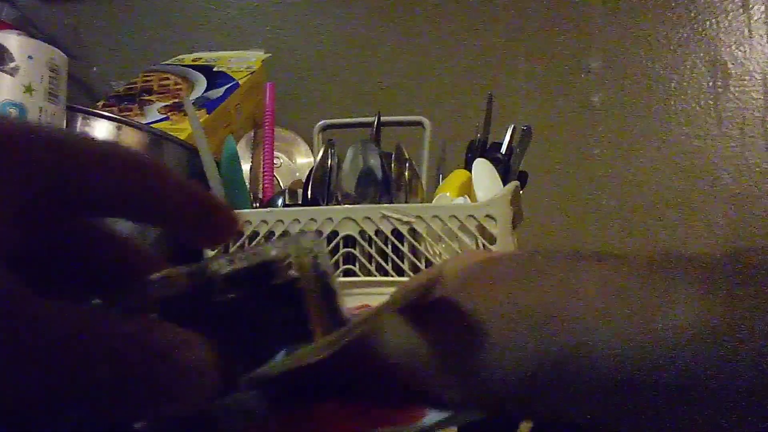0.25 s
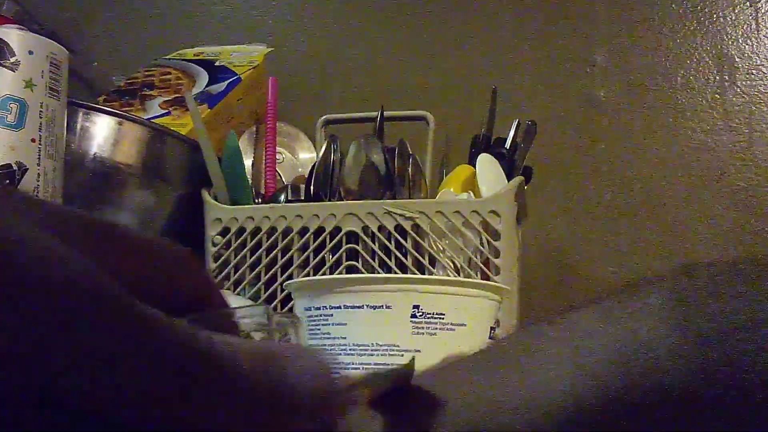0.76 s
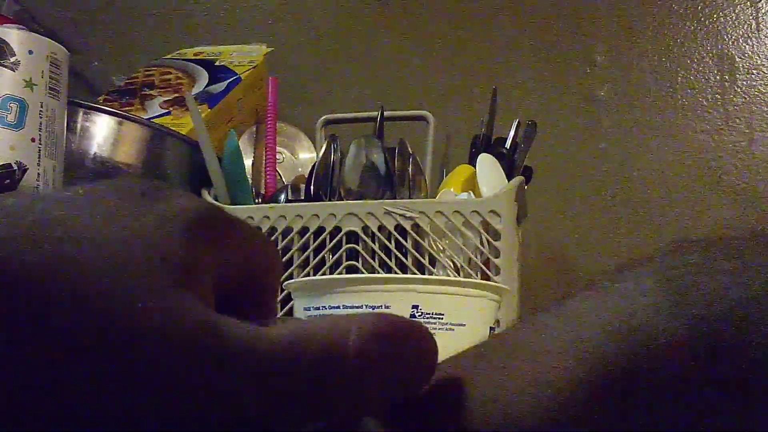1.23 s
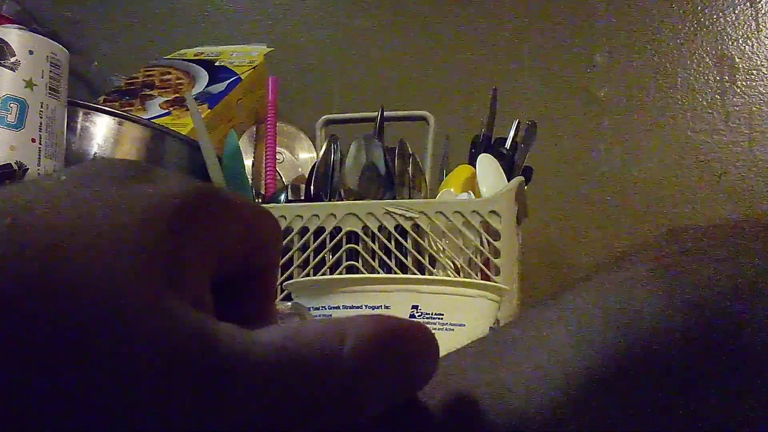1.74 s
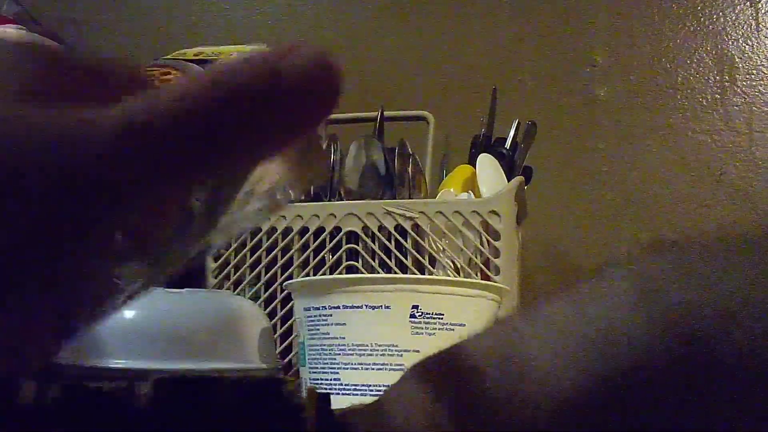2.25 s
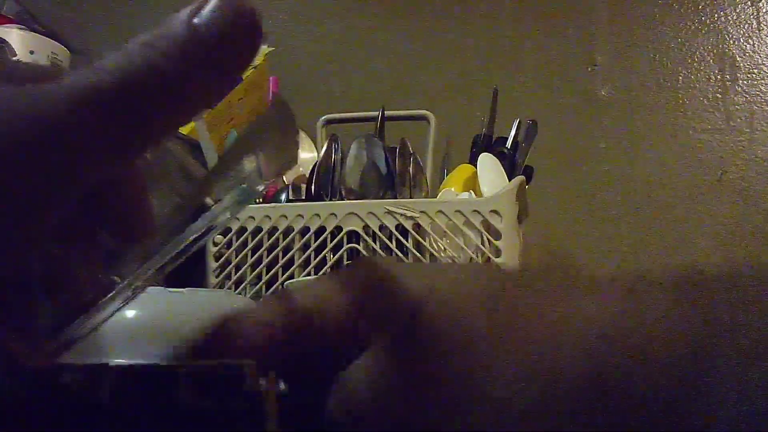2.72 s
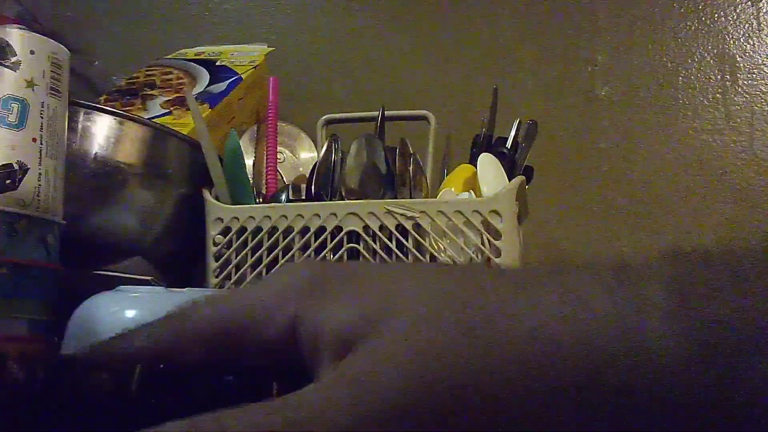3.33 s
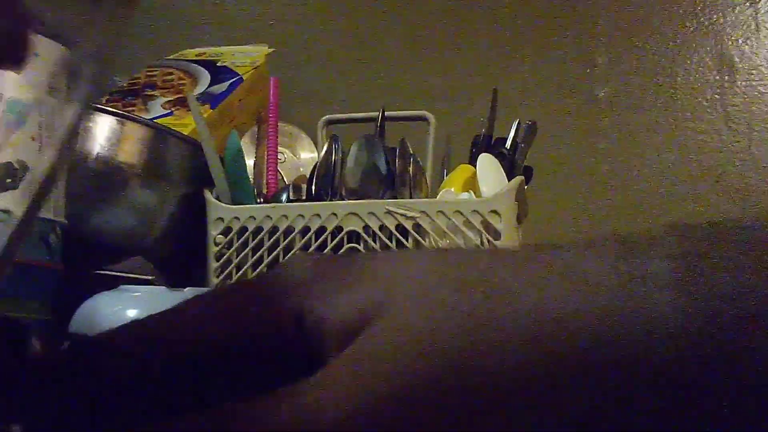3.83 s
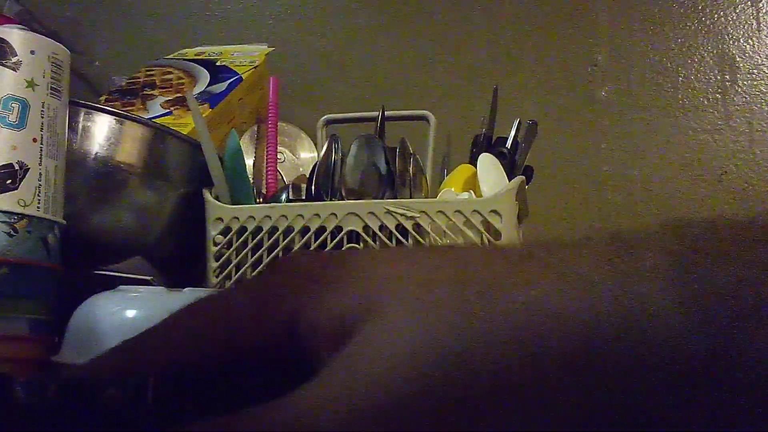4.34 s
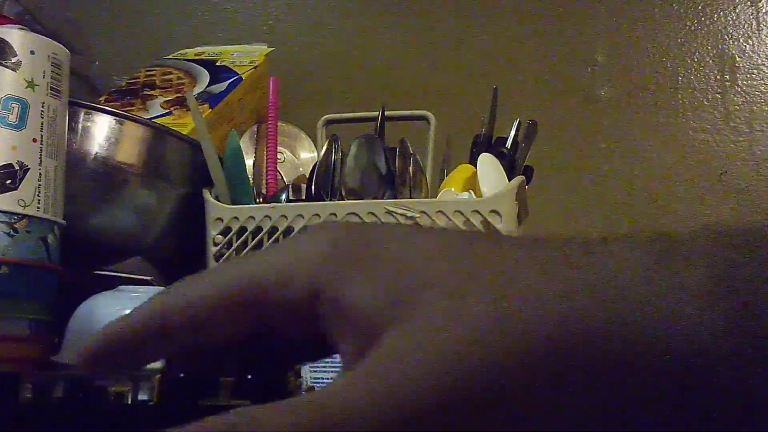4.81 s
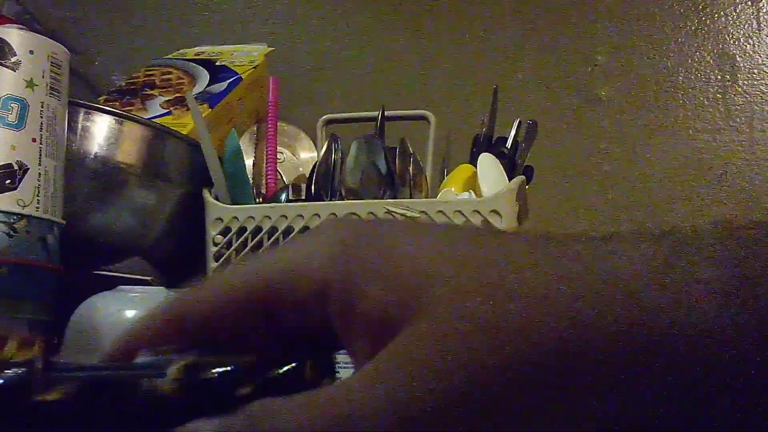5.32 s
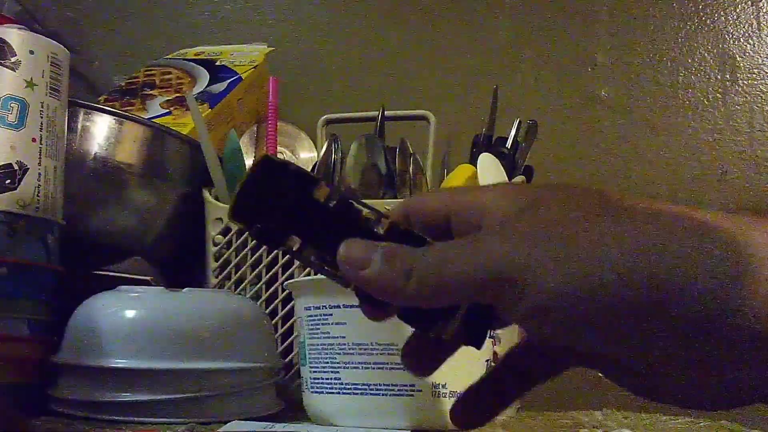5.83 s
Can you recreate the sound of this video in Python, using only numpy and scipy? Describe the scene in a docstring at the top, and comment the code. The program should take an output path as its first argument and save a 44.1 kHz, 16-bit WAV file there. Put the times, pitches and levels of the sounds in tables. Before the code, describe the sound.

Close to the microphone in a small kitchen, hands rub a card-backed plastic pack with soft scuffs and brief stuttering squeaks. A few dull pops lead to a dense burst of snaps, tearing and crackles with counter thumps. Sparser tears and flexes follow, then two hard snaps with short room tails, and finally faint ticks and a light knock.

```python
"""A plastic blister is pulled off its card by hand over a kitchen counter, close to the microphone.
The thin shell snaps and flexes in short noise jolts with ringing modes; the glued card tears in tiny clicks.
Skin rubs in grains and judders in trains of slips; pack and contents knock, hands bump the counter.
Decaying noise bands make the kitchen around it, a smooth background hiss fades in and out, and a limiter
ducks the hardest snaps, so the room swells up behind them; dense noise tails fill it out after two."""
import sys
import numpy as np
from scipy import signal
from scipy.fft import rfft, irfft, next_fast_len
from scipy.io import wavfile
from scipy.ndimage import uniform_filter1d, minimum_filter1d

SR = 44100
rng = np.random.default_rng(int(sys.argv[2]) if len(sys.argv) > 2 else 0)


def waveform_to_disk(signal):
    """Save audio, clipped to [-1, 1], as 16-bit WAV at the path in sys.argv[1]."""
    frames = np.transpose(np.atleast_2d(signal))
    scaled = np.clip(frames, -1, 1) * 32767
    samples = np.round(scaled).astype(np.int16)
    wavfile.write(sys.argv[1], SR, samples)


N = 267687
TIME = np.arange(N) / SR

# steady background of the place, its spectrum: freq_hz [Hz], level_db [dB]
FLOOR_SPECTRUM = [(30, -15), (130, 0.5), (300, -16), (7000, -32)]
FLOOR_DB = -71
# a smooth background hiss fades in and out: start_s [s], length_s [s], level_db halfway [dB]
HISS_SWELLS = [(.1, 0.34, -56.5), (.5, 0.41, -53), (.97, 0.13, -60.5), (1.76, 0.21, -58.5),
               (5.7, 0.49, -57)]
# kitchen decay: freq_hz [Hz], t60_s [s]
ROOM_T60 = [(600, 0.25), (2500, 0.29)]
# a dense, even noise tail of the room swells up behind two hard snaps:
# start_s [s], length_s [s], level_db [dB]
ROOM_TAILS = [(4.125, 0.13, -43), (4.574, 0.039, -34.5)]
# hands bump the counter: start_s [s], level_db of the boom [dB], pitch_hz [Hz], t60_s [s]
BUMPS = [(1.595, -17, 175, 0.045), (2.024, -25.5, 102, 0.06), (2.249, -35.5, 115, 0.22),
         (2.76, -33, 109.6, 0.09), (3.445, -34.5, 131.2, 0.15), (4.265, -27, 128.5, 0.19)]
# skin sticks and slips on the pack: start_s [s], end_s [s], slip_rate [slips per s], level_db [dB]
JUDDERS = [(0.374, 0.522, 91.4, -41.5), (0.655, 0.69, 84, -40), (0.809, 0.847, 76, -46),
           (4.511, 4.545, 136, -27)]
# fingertips scuff the card: start_s [s], length_s [s], level_db halfway [dB]
SCUFFS = [(.02, 0.092, -58.5), (.17, 0.64, -49.5), (.245, 0.019, -46), (.465, 0.019, -37.5),
          (.55, 0.19, -51.5), (.643, 0.0063, -37), (1.055, 0.027, -42), (1.185, 0.27, -53),
          (2.003, 0.022, -29), (5.075, 0.05, -53.5)]
# each pull tears a stretch of card and crinkles the shell: start_s [s], length_s [s], level_db halfway [dB]
PULLS = [(1.965, 0.072, -42.5), (2.015, 0.046, -30.5), (2.24, 0.099, -37.5), (2.51, 0.051, -45),
         (2.705, 0.1, -47), (2.86, 0.067, -44), (3.18, 0.13, -41.5), (3.31, 0.095, -53),
         (4.065, 0.051, -52.5)]
# spectra of background hiss, scuffing and tearing: freq_hz [Hz], level_db [dB]
HISS_SPECTRUM = [(400, -10.5), (2300, 2.5), (3450, -2.5), (4200, 4), (4900, -2.5), (6200, 3.5), (8000, -20)]
SCUFF_SPECTRUM = [(120, -14.5), (380, 3.5), (850, -7.5), (2200, -9), (8000, -27.5)]
TEAR_SPECTRUM = [(100, -19.5), (400, -2), (2500, -1), (7500, -7)]
# resonances of the plastic shell: freq_hz [Hz], width_hz [Hz], level_db [dB]
SHELL = [(888, 240, 9.5), (1956, 260, 1.5), (2350, 540, -6.5), (3830, 830, -4), (4630, 610, 0.5),
         (6540, 280, 4.5)]
# single short ticks: a spot of the pack flexes, or, at low centres near 600-800 Hz, a small dull knock: start_s
# [s], level_db [dB], centre_hz [Hz]
TICKS = [(0.071, -54.5, 1090), (1.4841, -40.5, 700), (1.5446, -37.5, 730), (1.641, -44.5, 2000),
         (1.663, -46, 1560), (1.731, -51, 1560), (1.806, -51, 1560), (1.828, -44.5, 700),
         (1.8858, -41.5, 640), (1.953, -43, 800), (1.9903, -32.5, 617), (2.0681, -24, 1820),
         (2.189, -37, 2350), (2.2132, -36.5, 2510), (2.2201, -27.5, 3930), (2.2329, -25.5, 843),
         (2.2987, -39, 2450), (2.308, -38.5, 1010), (2.32, -46, 4750), (2.329, -42.5, 1000),
         (2.352, -47, 4620), (2.394, -43.5, 2220), (2.7534, -36.5, 4500), (2.8446, -46, 2340),
         (2.8747, -35.5, 5000), (2.908, -42.5, 4900), (2.914, -44.5, 4600), (3.2342, -40, 4720),
         (3.3264, -53.5, 2450), (3.364, -42, 2320), (3.3905, -47, 2300), (3.4401, -29, 1750),
         (3.797, -62, 2750), (3.872, -42, 1350), (5.232, -48.5, 4570), (5.327, -60.5, 2480),
         (5.777, -49.5, 1830)]
# a crease gives way in a slow run of ticks:
# start_s [s], length_s [s], level_db of the first tick [dB], centre_hz [Hz]
CREASES = [(1.773, .02, -54, 1630), (2.9415, 0.034, -56, 4600), (3.678, 0.038, -63, 2820),
           (3.816, 0.034, -52.5, 2600), (4.8165, 0.051, -44.5, 2780), (5.3775, 0.022, -42, 2570)]
# a patch of shell crumples in a fast run of ticks:
# start_s [s], length_s [s], level_db of the first tick [dB], centre_hz [Hz]
CRACKLES = [(.6424, .03, -37.5, 1020), (2.039, .014, -26, 2200), (2.256, .035, -36, 4110),
            (2.548, .02, -45, 2560), (2.857, .01, -44, 2130), (2.8706, .01, -38.5, 5240),
            (2.894, .01, -44.5, 3000), (3.173, .02, -45, 4180), (3.218, .025, -53, 2490),
            (3.2565, .02, -36, 2530), (3.263, .015, -35, 4640), (5.4465, .025, -48, 2690),
            (5.4735, .022, -48, 3080)]
# modes of the hollow pack and contents: freq_hz [Hz], mean level_db [dB]
BODY = [(330, -14.5), (506, -1.5), (703, -3), (946, 3)]
# duller blows on card and contents: start_s [s], level_db [dB], brightness [dB per octave],
# ring_hz [Hz], body_db above level_db [dB]
KNOCKS = [(0.9721, -40.5, -1, 667, 11), (1.5944, -42.5, -4, 520, -0.5), (2.7568, -39, -2, 842, 3.5),
          (3.4407, -46.5, -5.5, 607, 7.5), (5.07, -57.5, -0.5, 708, -14.5), (5.1145, -58, 3.5, 728, -6),
          (5.7757, -46, -3, 707, 13)]
# the shell buckles: start_s [s], level_db [dB], brightness [dB per octave],
# ring_hz [Hz], ring_db above level_db [dB], fold_hz [Hz]
SNAPS = [(1.222, -34.5, -5.5, 762, 5, 1910), (1.3676, -43.5, -1.6, 843, 1, 3630),
         (1.5339, -42, 0.5, 1553, 6, 2010), (2.0239, -27, -5, 910, -3, 3480),
         (2.034, -22.5, 1, 737, 10.5, 2018), (2.1422, -38, 0, 1042, 14.5, 3800),
         (2.249, -27.5, -2.5, 964, -2, 2480), (2.4689, -28.5, -1, 973, 0, 2100),
         (3.184, -41.5, -3, 867, 8.5, 4840), (3.892, -34.5, 0.5, 1005, 2.5, 2240),
         (4.1136, -21, 3.5, 940, 10, 2330), (4.2248, -34, -2.5, 1010, 5.5, 2300),
         (4.2534, -26, -3.5, 950, 1.5, 2370), (4.267, -28.5, -1, 1040, -10, 3680),
         (4.561, -22, 1, 1438, 1, 2530)]


def from_db(db):
    """Decibels to gain."""
    return 10 ** (np.asarray(db) / 20)


def rms_one(x):
    """Scale to rms 1."""
    return x / np.sqrt(np.mean(x ** 2) + 1e-20)


def at_hz(points, hz):
    """Read a table on a log-frequency axis."""
    freqs, values = np.transpose(points)
    return np.interp(np.log(hz + 1), np.log(freqs), values)


def band(x, low_hz, high_hz, order=2):
    """Causal band-pass."""
    sos = signal.butter(order, [low_hz, min(high_hz, SR / 2 - 1)], "band", fs=SR, output="sos")
    return signal.sosfilt(sos, x + 1e-18)


def resonance(x, hz, width_hz):
    """Two-pole resonance with gain near 1 at its peak."""
    r = np.exp(-np.pi * width_hz / SR)
    feed = np.array([1, 0, -1]) * (1 - r * r) / 2
    return signal.lfilter(feed, [1, -2 * r * np.cos(2 * np.pi * hz / SR), r * r], x + 1e-18)


def colour(x, spectrum):
    """Filter a sound through a smooth spectrum; rms 1."""
    size = next_fast_len(N)
    gain = from_db(at_hz(spectrum, np.fft.rfftfreq(size, 1 / SR)))
    return rms_one(irfft(rfft(x, size) * gain, size)[:N])


def drift(per_s):
    """Random wander through per_s new values a second; rms 1."""
    knots = np.arange(0, N / SR + 1, 1 / per_s)
    values = rng.standard_normal(4096)[:len(knots)]
    return rms_one(np.interp(TIME, knots, values))


def dying(t, t60):
    """Exponential decay by 60 dB in t60 seconds."""
    return np.exp(-np.log(1000) * t / t60)


def add(track, s, sound):
    """Mix a sound in at a time."""
    at = round(s * SR)
    track[at:at + len(sound)] += sound[:N - at]


def blow_level(x, db):
    """Set the rms of a blow's first hundredth of a second."""
    return from_db(db) * x / np.sqrt(np.mean(x[:SR // 100] ** 2) + 1e-20)


def grains(per_s, spread_db):
    """Random tiny clicks of uneven size and either sign; rms 1."""
    steps = np.minimum(rng.exponential(1, N), 4)
    sizes = from_db(spread_db * steps) * rng.choice([-1, 1], N)
    return rms_one(sizes * (rng.random(N) < per_s / SR))


def strokes(rows, attack_s, release_s, end_drop_db):
    """Gain that fades in, arcs through the middle of each row and fades out; times are for 60 dB."""
    power = 0
    for start, length, db in rows:
        along = np.clip((TIME - start) / length, 0, 1)
        before, after = np.maximum(start - TIME, 0), np.maximum(TIME - start - length, 0)
        fade = dying(before, attack_s) * dying(after, release_s)
        arc_db = db - end_drop_db * (2 * along - 1) ** 2
        power = power + (fade * from_db(arc_db)) ** 2
    return np.sqrt(power)


def background():
    """Steady coloured noise lies under the whole scene."""
    return from_db(FLOOR_DB) * colour(rng.standard_normal(N), FLOOR_SPECTRUM)


def background_hiss():
    """Smooth, steady coloured noise fades in and out."""
    hiss = colour(rng.standard_normal(N), HISS_SPECTRUM)
    return strokes(HISS_SWELLS, attack_s=0.15, release_s=0.17, end_drop_db=5) * hiss


def kitchen(x, wet_db, bass_db):
    """Diffuse reflections build up within milliseconds and die band by band."""
    t, edges = np.arange(SR * 3 // 4) / SR, np.geomspace(70, 9000, 9)
    response = 0
    for low, high in zip(edges, edges[1:]):
        hz = np.sqrt(low * high)
        gain = from_db(at_hz([(300, bass_db), (1800, 0.96), (7000, 0.6)], hz))   # (Hz, dB)
        noise = band(rng.standard_normal(len(t)), low, high)
        response = response + gain * noise * dying(t, at_hz(ROOM_T60, hz))
    build_up = np.clip((t - 0.003) / 0.0057, 0, 1)
    response = response * build_up / np.sqrt(SR / 30)
    return from_db(wet_db) * signal.fftconvolve(x, response)[:N]


def room_tails():
    """Crowded clicks blur into dense, even noise, the tail of the room behind two hard snaps."""
    dense = rms_one(band(grains(per_s=3200, spread_db=2), 1100, 3300, order=1))
    return strokes(ROOM_TAILS, attack_s=0.02, release_s=0.26, end_drop_db=0) * dense


def bumps():
    """A soft hand gives the counter a dull pat and sets one low mode booming."""
    out, t = np.zeros(N), np.arange(SR // 2) / SR
    for s, db, hz, t60 in BUMPS:
        boom = np.sin(2 * np.pi * hz * t) * dying(t, t60)
        thump = rms_one(band(rng.standard_normal(len(t)), 64, 310, order=3))
        pat = 0.76 * thump * dying(t, t60 / 2)
        soft_onset = 1 - dying(t, 0.0021)
        add(out, s, from_db(db) * (boom + pat) * soft_onset)
    return out


def judders():
    """A nearly regular train of soft slips groans in the card, each with a faint scratch."""
    out = np.zeros(N)
    for start, end, per_s, db in JUDDERS:
        turns = np.cumsum(per_s * (1 + 0.049 * drift(60))) / SR
        slips = np.diff(np.floor(turns), prepend=0)
        noise = rng.standard_normal(N) * (1 - turns % 1) ** 2   # fades after each slip
        scratch = rms_one(resonance(noise, 1500, 220) + resonance(noise, 3600, 600) * 0.22)
        groan = rms_one(band(slips, per_s * 0.78, per_s * 2.47, order=3))
        along = np.clip((TIME - start) / (end - start), 0, 1)
        swell = np.sqrt(np.abs(np.sin(np.pi * along)))
        out += from_db(db) * (groan + 0.085 * scratch) * swell
    return out


def rubbing():
    """Skin catches on the card in small grains."""
    catches = grains(per_s=600, spread_db=3) * from_db(3.5 * drift(70))
    scuff = colour(catches + 1.9 * resonance(catches, 830, 220), SCUFF_SPECTRUM)
    return strokes(SCUFFS, attack_s=0.088, release_s=0.36, end_drop_db=7) * scuff


def tearing():
    """Card fibres and glue let go in uneven tiny clicks, shaking each shell resonance by a wandering amount."""
    fibres = grains(per_s=450, spread_db=4) * from_db(2.5 * drift(100))
    crinkle = fibres / 2
    for hz, width, db in SHELL:
        crinkle = crinkle + resonance(fibres * from_db(db + 5.5 * drift(50)), hz, width)
    # the negative drop leaves a pull slightly stronger at its ends than halfway
    pull_gain = strokes(PULLS, attack_s=0.069, release_s=0.15, end_drop_db=-0.5)
    return pull_gain * colour(crinkle, TEAR_SPECTRUM)


def shell(x, direct):
    """The blister's resonances colour whatever shakes it."""
    return direct * x + sum(from_db(db) * resonance(x, hz, width) for hz, width, db in SHELL)


def jolt(t60, flutter_db, flutter_t60):
    """A fold runs across the sheet in a moment; the weaker flutter of its many crowded modes outlasts it."""
    t = np.arange(SR // 8) / SR
    fold = dying(t, t60) * (1 - dying(t, 0.016))
    flutter = from_db(flutter_db) * dying(t, flutter_t60)
    return rng.standard_normal(len(t)) * (fold + flutter)


def tick(db, hz):
    """A short jolt shakes the shell and rings briefly at a pitch of its own."""
    push = shell(jolt(t60=0.011, flutter_db=-26.5, flutter_t60=0.12), direct=0.75)
    ring = resonance(push, hz, width_hz=364)
    return blow_level(band(ring + from_db(-20) * push, 260, 4900), db)


def tick_runs(rows, gap_s, loss_db):
    """Ticks at nearly even gaps, uneven in strength and pitch, fading by loss_db a tick as the fold gives way."""
    out = np.zeros(N)
    for start, length, db, hz in rows:
        for k in range(1 + int(length / gap_s)):
            late, strength, detune = rng.standard_normal(3) * min(k, 1)   # the first tick is exact
            delay = gap_s * (k + 0.15 * np.sqrt(k) * late)
            tick_db = db - loss_db * k + 2.5 * strength
            add(out, start + delay, tick(tick_db, hz * np.exp(0.096 * detune)))
    return out


def flexing():
    """Single ticks, slow creases and fast crackles of the shell."""
    out = tick_runs(CREASES, gap_s=0.015, loss_db=1.5) + tick_runs(CRACKLES, gap_s=0.0053, loss_db=2.0)
    for s, db, hz in TICKS:
        add(out, s, tick(db, hz))
    return out


def blow(db, brightness, hz, ring_db, fold_hz, thud_db, clack_db, crack_db,
         t60, flutter_db, flutter_t60, ring_t60, broad, high_t60):
    """A blow shakes the whole pack (thud), one panel (ring) and its stiff creases (clack, crack)."""
    t = np.arange(SR // 8) / SR
    push = jolt(t60, flutter_db, flutter_t60)
    thud = band(push, 240, 621, order=3)
    turns = np.cumsum(hz * (1 + 0.017 * dying(t, 0.041))) / SR   # the panel's pitch settles as it relaxes
    panel = np.sin(2 * np.pi * turns) * dying(t, ring_t60) * (1 - dying(t, 0.00084))
    ring = blow_level(panel, 0) + broad * blow_level(band(push, 484, 1300, order=3), 0)
    brief = push * dying(t, high_t60)   # the high modes die sooner
    clack = band(brief, fold_hz / 1.17, fold_hz * 1.13)
    crack = band(shell(brief, direct=4.5), 3400, 6390, order=3)
    # sound, dB, octaves from the ring over which brightness tilts the level
    parts = [(thud, thud_db, -1.5), (ring, ring_db, 0), (clack, clack_db, 1.15), (crack, crack_db, 2.25)]
    return sum(blow_level(part, db + part_db + brightness * octaves) for part, part_db, octaves in parts)


def knocks():
    """A duller blow also sets the hollow body ringing, each mode with a new strength."""
    out, t = np.zeros(N), np.arange(SR // 8) / SR
    for s, db, brightness, hz, body_db in KNOCKS:
        hit = blow(db, brightness, hz, ring_db=12, fold_hz=2150, thud_db=7.0, clack_db=4.5, crack_db=-4.0,
                   t60=0.013, flutter_db=-12.0, flutter_t60=0.037, ring_t60=0.057, broad=0.64, high_t60=0.071)
        body = np.zeros(len(t))
        for k, (mode_hz, mode_db) in enumerate(BODY):
            strength = from_db(mode_db + rng.normal(0, 5.1))
            body += strength * np.sin(2 * np.pi * mode_hz * t) * (-1) ** k   # alternating sign
        add(out, s, hit + blow_level(body * dying(t, 0.081), db + body_db))
    return out


def snaps():
    """The shell buckles with a short blow, and the fold that gives way clacks in a band of its own."""
    out = np.zeros(N)
    for s, *snap in SNAPS:
        add(out, s, blow(*snap, thud_db=-5.0, clack_db=3.5, crack_db=-1.0, t60=0.0099, flutter_db=-26.0,
                         flutter_t60=0.093, ring_t60=0.029, broad=0.74, high_t60=0.19))
    return out


def scene():
    """The pack in the hands, the kitchen around it; flexing and room tails send less to the kitchen."""
    full_send = background_hiss() + bumps() + judders() + rubbing() + tearing() + knocks() + snaps()
    less_send = room_tails() + flexing()
    room = kitchen(full_send + from_db(-2.5) * less_send, wet_db=-9, bass_db=1.9)
    return (background() + room + less_send + full_send)[None]


def limiter(x, ceiling_db, release_db_per_s):
    """Gain drops just ahead of a peak and climbs back steadily in decibels."""
    over = np.maximum(20 * np.log10(np.abs(x) + 1e-9) - ceiling_db, 0)
    climb = release_db_per_s * TIME
    gain = from_db(climb - np.maximum.accumulate(over + climb, axis=-1))
    ahead = minimum_filter1d(gain, SR // 500)   # 2 ms window, centred
    return x * uniform_filter1d(ahead, SR // 500)


def record(dry):
    """A limiter, a microphone without deep bass, then a steep cut of the top."""
    limited = limiter(dry, ceiling_db=-9.5, release_db_per_s=117.0)
    thinned = signal.sosfilt(signal.butter(2, 50, "high", fs=SR, output="sos"), limited)
    return signal.sosfilt(signal.butter(26, 7700, fs=SR, output="sos"), thinned)


dry = scene()
out = record(dry)
waveform_to_disk(out)
```